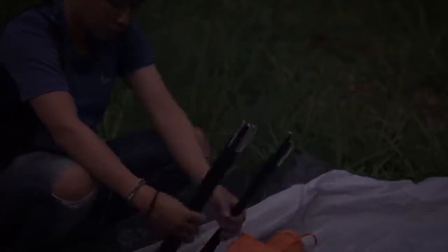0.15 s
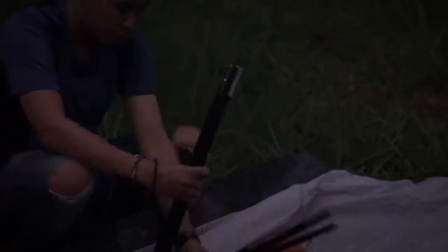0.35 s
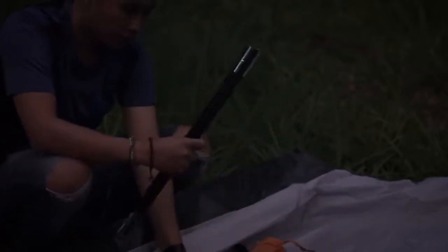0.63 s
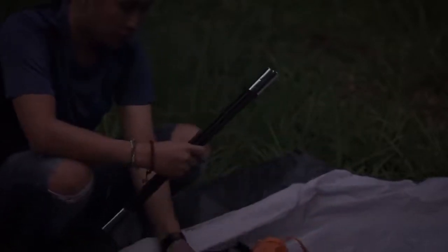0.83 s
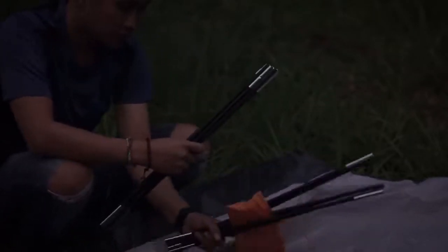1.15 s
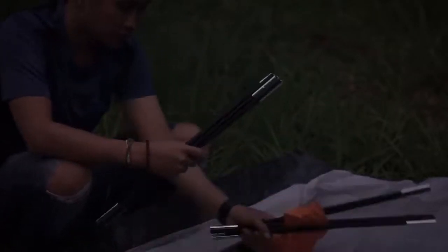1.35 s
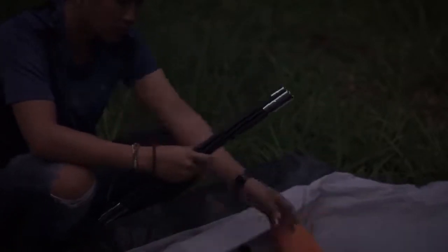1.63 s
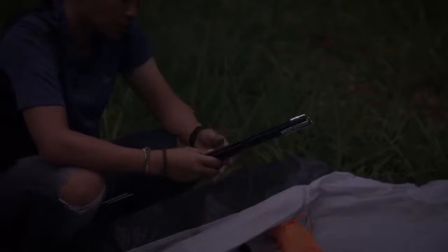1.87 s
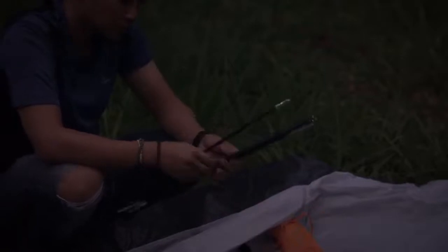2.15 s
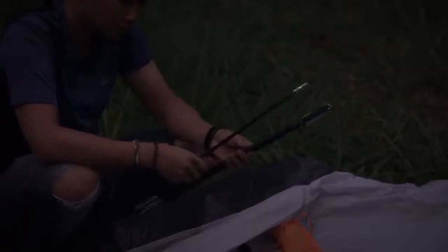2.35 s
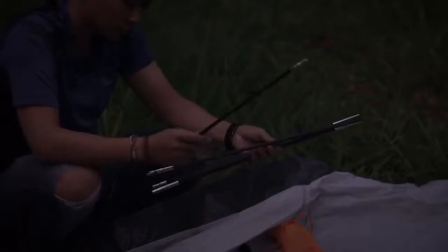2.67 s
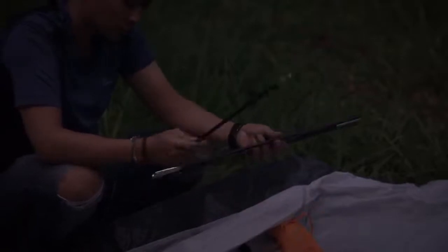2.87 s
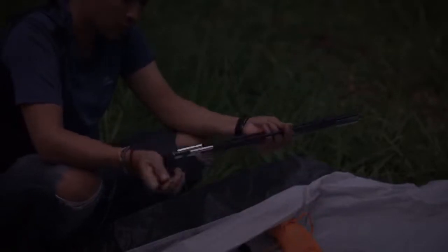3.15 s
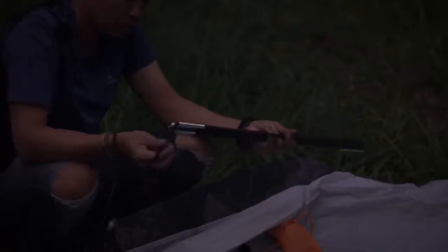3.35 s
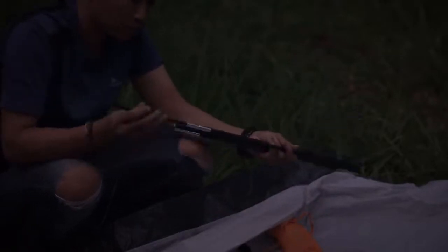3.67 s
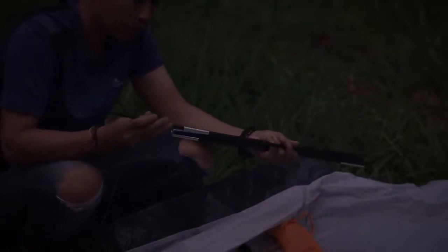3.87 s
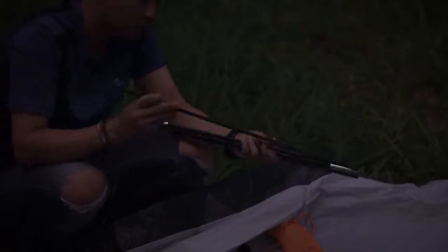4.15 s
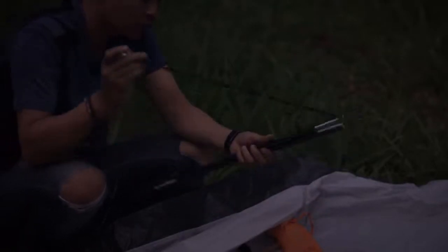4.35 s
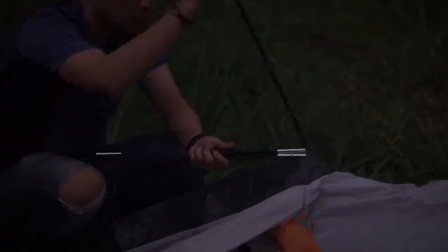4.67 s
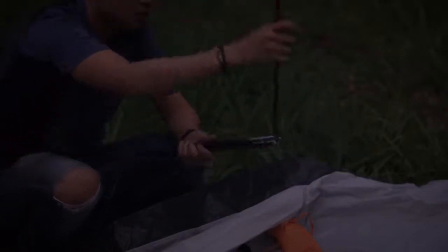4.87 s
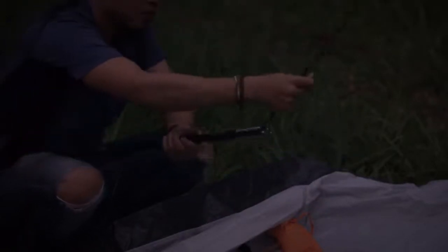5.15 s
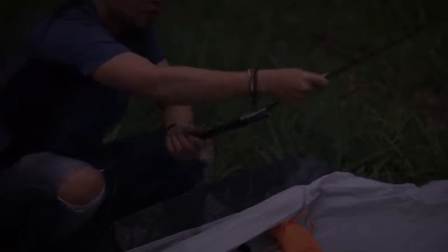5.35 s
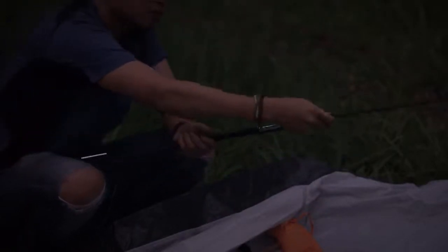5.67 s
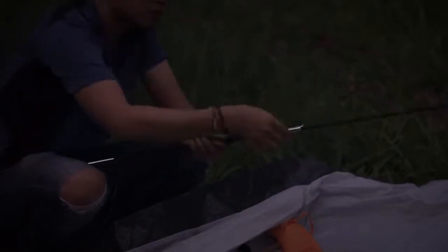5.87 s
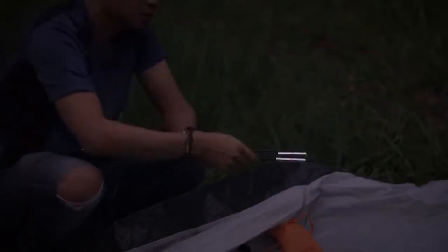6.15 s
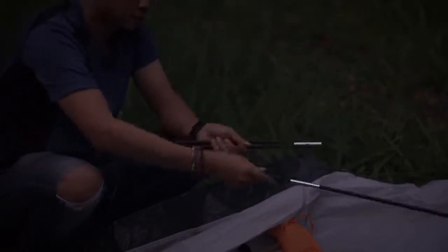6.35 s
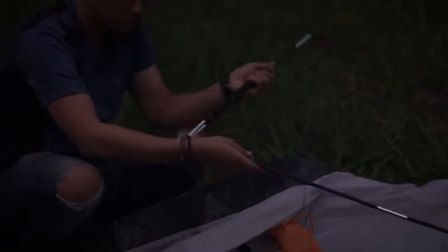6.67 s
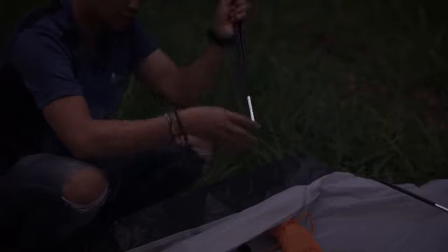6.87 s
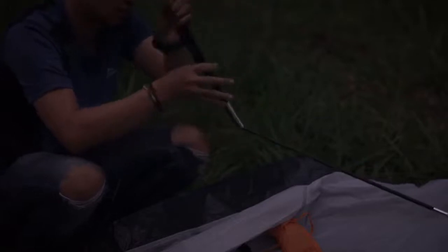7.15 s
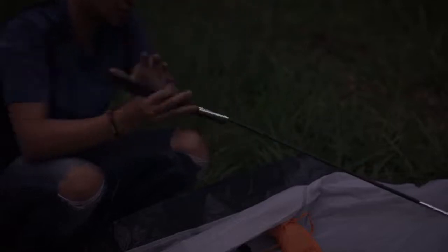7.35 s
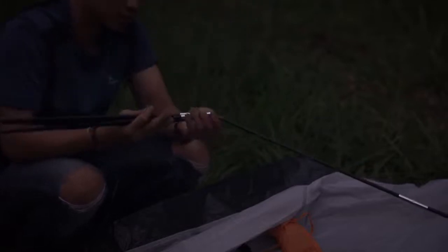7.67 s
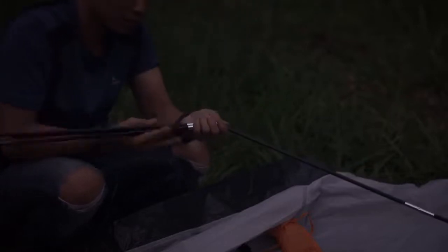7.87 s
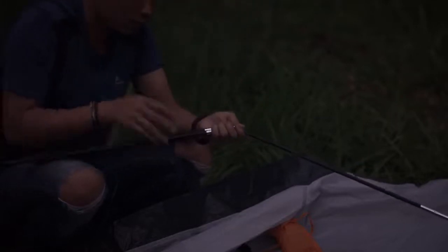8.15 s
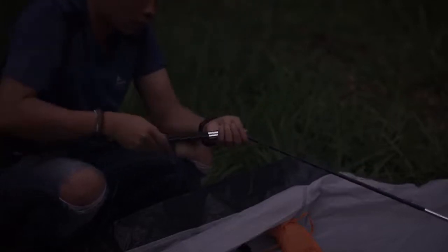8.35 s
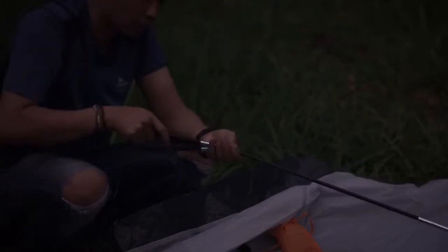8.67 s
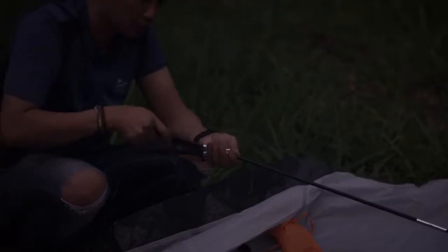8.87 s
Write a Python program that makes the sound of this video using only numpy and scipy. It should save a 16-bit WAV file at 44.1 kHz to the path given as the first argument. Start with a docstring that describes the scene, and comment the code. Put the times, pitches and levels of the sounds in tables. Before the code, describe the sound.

Bright metallic clicks and rattles of thin tent poles over rustling nylon, in a dusk meadow of throbbing insects and a chirping cricket.

```python
"""A meadow at dusk: someone crouching in tall grass lays tent poles on nylon and unfolds a corded pole.
Fabric is shaped noise driven by stroke speed, with creases popping in it and folds snapping over.
Rods and ferrules are noisy contact forces through pole resonances: knocks, scrapes and snaps.
Insects are throbbing noise bands, wing tones and rasps; two far birds are gliding, echoing tones.
The recorder cuts the bass steeply."""
import sys
import numpy as np
from scipy import signal
from scipy.fft import rfft, irfft, next_fast_len
from scipy.io import wavfile

SR = 44100
rng = np.random.default_rng(int(sys.argv[2]) if len(sys.argv) > 2 else 0)


def generate_wav(sig):
    """Save sig (samples, or channels by samples) to the path in sys.argv[1] as 16-bit PCM at SR."""
    pcm = np.round(np.clip(np.atleast_2d(sig).T, -1, 1) * 32767).astype(np.int16)
    wavfile.write(sys.argv[1], SR, pcm)


N = 397782
TIME = np.arange(N) / SR

# far hiss of the meadow: freq_hz, relative_density_db
MEADOW_SPECTRUM = [(1000, 3.5), (2000, -4), (3000, 2.5), (4500, 4.5), (5300, 4.5), (6100, -1), (7800, -1.5),
                   (10000, -1.5), (13000, -2.5), (16000, -4.5)]
MEADOW_DB = -52
# insect choruses: centre_hz, width_hz, level_db (before CHORUS_GAIN_DB), throb_share, left_right_db
CHORUSES = [(3920, 260, -58, 0.74, -8), (3598, 210, -61.5, 0.77, -10), (5502, 190, -63.5, .2, -6.5),
            (8420, 920, -67.5, 0.33, -6.5), (2860, 29, -78, -0.53, -2.5)]
CHORUS_GAIN_DB = 1.8
LULL_S, LULL_HALF_S, LULL_DB = 3.53, 0.14, -6.5  # the choruses fall back briefly
THROB_HZ, THROB_GAIN_HZ_PER_S, FIRST_THROB_S, THROB_DEPTH_DB = 5.356, .036, .02, 4.6
# throb running ahead of its beat, then falling back in the lull: time_s, lead_s
THROB_LEAD = [(1.2, 0), (3.3, .06), (3.8, 0)]
# high insect repeating one rasping phrase
PHRASE_S, PHRASE_START_S = .885, .25
TRILL_HZ, TRILL_RISE_HZ, TRILL_WIDTH_HZ, TRILL_DB, TRILL_SWELL_DB = 8510, 602, 230, -69.5, 6
# strokes of hands, sleeves and poles over nylon:
# fastest_s, rise_s, fall_s, rub_db (before RUB_GAIN_DB), swish_db (before SWISH_GAIN_DB)
STROKES = [(0.131, 0.11, 0.048, -44.5, -41.5), (0.35, 0.083, 0.089, -64.5, -50),
           (0.573, 0.068, 0.059, -40.5, -36.5), (0.684, 0.052, 0.023, -41.5, -44),
           (0.85, 0.45, 0.41, -48, -43.5), (1.02, 0.13, 0.014, -49, -34.5), (1.333, 0.14, 0.03, -56, -52),
           (1.592, 0.081, 0.13, -51, -32), (1.681, 0.072, 0.044, -33.5, -31.5),
           (1.89, 0.08, 0.049, -53.5, -51), (2.018, 0.036, 0.067, -63, -44),
           (2.279, 0.11, 0.081, -77.5, -48.5), (3.099, 0.022, 0.097, -61.5, -50),
           (3.729, 0.087, 0.16, -57.5, -48), (4.238, 0.012, 0.14, -71, -53), (4.476, 0.19, 0.07, -57, -55),
           (5.086, 0.008, 0.016, -55, -56), (5.535, 0.24, 0.25, -60.5, -55.5),
           (6.504, 0.023, 0.19, -54, -51), (6.81, 0.066, 0.16, -55.5, -45),
           (7.3, 0.16, 0.086, -60.5, -51.5), (7.47, 0.112, 0.23, -66.5, -55),
           (8.119, 0.12, 0.17, -73.5, -47), (8.384, 0.08, 0.041, -64.5, -51)]
RUB_GAIN_DB, SWISH_GAIN_DB = 5.0, 1.03
# colour of pressed nylon: freq_hz, relative_density_db
RUB_SPECTRUM = [(1200, 4), (1600, -1), (2300, -2.5), (3400, 8), (4600, 4), (6500, -3), (9000, -13.5),
                (16000, -24.5)]
# colour of dragged nylon: freq_hz, relative_density_db
SWISH_SPECTRUM = [(1200, -27), (3000, -12), (5000, -5.5), (8000, -2), (10500, 0), (13000, -1.5),
                  (16000, -4)]
# mean crease setting, and crease strength against thread hiss
RUB_CRINKLES_PER_S, RUB_CRINKLE, SWISH_CRINKLES_PER_S, SWISH_CRINKLE = 150, .85, 450, .55
# folds of nylon flicking over: start_s, level_db (over 10 ms), pitch_hz
FLICKS = [(0.042, -53.5, 2150), (0.133, -43, 3300), (.146, -45, 3020), (0.372, -54, 3860),
          (0.488, -42.5, 5100), (.5135, -45, 7500), (.5375, -49, 3770), (.549, -40, 5060),
          (.553, -40, 9500), (.5585, -42, 6340), (0.564, -47, 3800), (0.5712, -41, 3900),
          (0.575, -46, 3400), (0.5928, -43, 3400), (.6115, -47, 4200), (0.653, -51, 3200),
          (0.6755, -48, 4170), (0.6818, -38.5, 3700), (0.69, -42, 3900), (0.8457, -44, 4000),
          (1.0194, -49, 4050), (1.0238, -50, 3000)]
# pole knocks and ferrule snaps: start_s, level_db (over 10 ms), treble_over_body_db, chatter_s,
# left_right_db, ferrule_hz, clack_hz, clack_db (over 10 ms)
CLICKS = [(0.0883, -32.5, -8.5, 0.002, -2.5, 10200, 3840, -45),
          (0.1188, -43, -3, .0003, -3, 9800, 4050, -45), (0.1272, -39.5, 4, 0.0009, -2, 9500, 3830, -51),
          (.239, -37.5, 13, 0.0017, -5, 9400, 3700, -50), (0.932, -38, 14, .002, -10, 9350, 3780, -60),
          (0.985, -37, 12, 0.00059, -12, 10600, 3800, -55), (1.198, -28.5, 2, 0.0012, -5, 9700, 3170, -41),
          (1.4168, -45.5, -8, 0.0054, -0.5, 10000, 3800, -54.5),
          (1.4443, -42, -5, 0.0026, -13, 9800, 3950, -45), (1.586, -24, 3, 0.0034, -10, 10000, 3630, -39),
          (1.62, -19, 4, 0.0053, -8.5, 9800, 3150, -29.5), (1.6434, -25, 18, 0.0067, -6, 9800, 4500, -46),
          (1.689, -26, 0, 0.013, -4.5, 10100, 3780, -38), (1.723, -32.5, 9, 0.0052, -4, 12800, 3830, -57),
          (1.8891, -37, 1, 0.011, -4, 10300, 3760, -55),
          (2.0074, -22.5, 21, 0.0013, -7.5, 12200, 3670, -57),
          (2.0426, -37, 6.5, 0.0016, -6, 10200, 3750, -54),
          (2.2167, -23, 23, 0.00016, -1, 10400, 3640, -48), (2.2776, -37, 5, 0.0012, -4, 8950, 3860, -55),
          (2.2998, -40.5, 7, 0.0033, -5, 10000, 3800, -56), (2.6, -50, 10, 0.0066, -7, 10800, 3800, -60),
          (2.8302, -38.5, 6, 0.0083, -5.5, 10600, 3820, -47.5),
          (3.156, -33.5, 4, 0.0027, -6, 9800, 3120, -47.5), (3.653, -38, 9, .0014, -6, 10400, 3800, -60),
          (3.675, -33, 2, 0.00078, -6, 10200, 3920, -53),
          (3.7207, -18, 13.5, 0.0017, -6.5, 11700, 3960, -50), (3.723, -22, 5, 0.0027, 0, 11100, 3150, -55),
          (4.1598, -51, 3, 0.0034, -7, 9800, 3600, -46), (4.163, -59, -4, 0.0028, -8, 9800, 2930, -51.5),
          (4.357, -40, 1.5, 0.0048, -6, 10400, 3610, -61),
          (5.3789, -36, 8, 0.0022, -4.5, 10500, 4130, -42.5),
          (5.392, -43.5, 0, 0.006, -7, 10200, 3830, -48), (6.5047, -53, 4, .0004, -11, 10900, 3380, -59),
          (6.72, -50, 18, 0.00074, -13, 13000, 3800, -64),
          (6.7888, -35.5, 5, 0.0021, -14, 11500, 3000, -48.5),
          (6.87, -49, 10, .0004, -13, 13200, 3800, -64), (6.877, -49, 9, .003, -11, 13100, 3800, -60),
          (7.2946, -43.5, 8, 0.0027, -4, 12600, 3800, -60),
          (8.0435, -34, 5.5, 0.0041, -4.5, 11600, 3820, -47),
          (8.0815, -17, 18, 0.0029, -1.5, 11950, 3960, -40),
          (8.2315, -36.5, 3.5, 0.0044, -5.5, 12000, 3750, -44),
          (8.355, -28, 7, 0.0038, -4.5, 12400, 3880, -51), (8.487, -49.5, 11, 0.0072, -5, 12500, 3800, -67),
          (8.801, -40, 5.5, 0.0045, -7, 10000, 3590, -57)]
SOFT_S, CLACK_WIDTH_HZ = .005, 230
# ring of a pole section with its ferrule: mode_hz, width_hz, gain_db (means; each contact varies)
POLE_MODES = [(2970, 22, 2), (3787, 95, 7), (4743, 68, 7), (5654, 230, 8), (6650, 950, 0),
              (7800, 350, -3.5), (8750, 320, 6.5), (10520, 170, 1), (11200, 110, 4), (11600, 92, -0.5),
              (13000, 210, 3), (14700, 260, 3)]
# low, slowly rising bird whistles: start_s, start_hz, level_db (before BIRD_GAIN_DB)
WHISTLES = [(0.252, 1825, -70), (3.73, 1940, -74), (4.49, 1878, -68.5), (6.929, 1920, -70.5),
            (7.69, 1874, -71)]
# another bird's falling chips: start_s, start_hz, level_db (before BIRD_GAIN_DB)
CHIPS = [(1.432, 5820, -55), (2.055, 5330, -54), (2.69, 5070, -61), (2.88, 5460, -62), (4.455, 5350, -54),
         (4.668, 5570, -60), (4.787, 5030, -58), (6.197, 5840, -56.5), (6.474, 5500, -54),
         (8.58, 5470, -60), (8.727, 5900, -57.5)]
WHISTLE_S, WHISTLE_RISE_HZ, WHISTLE_DIRECT = .32, 78, 0.23  # direct: against the echoes
CHIP_S, CHIP_FALL_HZ, CHIP_DIRECT = 0.04, 757, 0.99
BIRD_GAIN_DB, BIRD_SIDE_DB = 0.5, -3.5
# rods sliding on each other: start_s, length_s, scrape_db, lowest_hz, sing_start_hz, sing_db
SLIDES = [(0.959, 0.0274, -24.5, 7600, 3900, -43.5), (1.635, 0.022, -29, 5000, 4530, -48),
          (1.659, 0.037, -46, 4000, 3550, -41), (3.078, 0.064, -58, 4040, 3460, -52),
          (3.664, 0.024, -40, 5900, 3700, -58), (3.733, 0.011, -37, 3560, 3240, -57),
          (4.231, 0.039, -44, 3980, 3670, -50.5), (5.068, 0.035, -49.5, 3500, 3150, -54),
          (6.49, 0.036, -56, 3500, 3450, -53.5), (8.032, 0.012, -41, 4870, 3920, -47),
          (8.078, 0.013, -25.5, 7000, 3940, -49), (8.086, 0.025, -41, 7000, 3970, -52)]
SING_WIDTH_HZ = 240
# nearer cricket in bouts: first_chirp_s, chirp_count, level_db (before CRICKET_GAIN_DB)
CRICKET_BOUTS = [(1.118, 4, -56.5), (1.826, 4, -50.5), (2.461, 6, -52.5), (3.647, 5, -51.5),
                 (4.518, 5, -54), (5.47, 5, -53), (6.41, 5, -54), (7.122, 4, -55), (7.99, 5, -55.5),
                 (8.715, 4, -55.5)]
CRICKET_HZ, CHIRP_GAP_S, CRICKET_GAIN_DB = 5640, .077, -2
# smooth rods running through the palm: fastest_s, rise_s, fall_s, level_db
GLIDES = [(1.33, 0.029, .02, -51), (1.51, 0.018, 0.058, -36), (1.725, 0.025, 0.009, -35),
          (2.035, 0.022, 0.018, -49), (6.505, .012, 0.13, -49), (6.722, 0.0065, 0.011, -50),
          (6.785, 0.038, 0.12, -43), (6.875, .03, .02, -48), (6.94, 0.024, .025, -49),
          (7.105, 0.018, 0.038, -53), (7.29, .02, .025, -53), (7.49, 0.1, 0.22, -51),
          (8.11, 0.019, 0.032, -43.5), (8.305, 0.037, .02, -49.5)]
# colour of a rod gliding through the palm: freq_hz, relative_density_db
GLIDE_SPECTRUM = [(5000, -27), (8000, -14), (10000, -7.5), (11500, -3), (13000, 1.5), (14200, -2.5),
                  (15500, 0.5)]
# second, lower rasping insect: middle_s, half_length_s (to 1/e), pitch_hz, level_db
BUZZES = [(5.003, 0.39, 7430, -66.5), (5.778, 0.22, 7270, -68)]
BASS_CUT_HZ, CUTOFF_HZ = 1719, 15800


def from_db(db):
    """Decibels to gain."""
    return 10 ** (np.asarray(db) / 20)


def rms_one(x):
    """Scale to unit power."""
    return x / np.sqrt(np.mean(x ** 2) + 1e-20)


def pan(db):
    """Left and right gains of unit mean power."""
    return rms_one(from_db([[db / 2], [-db / 2]]))


def add(out, start_s, sound):
    """Mix a stereo sound in at a time."""
    i = max(int(start_s * SR), 0)
    out[:, i:i + sound.shape[1]] += sound[:, :N - i]


def cut(x, hz, kind, order=2):
    """Butterworth filter."""
    safe_hz = np.clip(hz, 10, .48 * SR)
    return signal.sosfilt(signal.butter(order, safe_hz, kind, fs=SR, output="sos"), x)


def resonance(x, hz, width_hz):
    """Two-pole resonance with about unit gain at its peak."""
    r = np.exp(-np.pi * width_hz / SR)
    numerator = np.array([1, 0, -1]) * (1 - r * r) / 2
    denominator = [1, -2 * r * np.cos(2 * np.pi * hz / SR), r * r]
    return signal.lfilter(numerator, denominator, x + 1e-18)


def coloured(x, spectrum):
    """Give a steady texture its spectrum; unit power."""
    hz, db = np.transpose(spectrum)
    size = next_fast_len(N)
    bins_hz = np.maximum(np.fft.rfftfreq(size, 1 / SR), 1)
    gain = from_db(np.interp(np.log(bins_hz), np.log(hz), db))
    return rms_one(irfft(rfft(x, size) * gain, size)[..., :N])


def drift(rate_hz):
    """Slow random wander with a spread of one: low-passed noise computed every 40 samples."""
    r = np.exp(-80 * np.pi * rate_hz / SR)
    noise = rng.standard_normal(N // 40 + 2002)
    slow = signal.lfilter([1], [1, -2 * r, r * r], noise)[2000:]  # drop the filter's run-in
    return np.interp(np.arange(N) / 40, np.arange(len(slow)), rms_one(slow))


def two_ears(three, shared):
    """A common signal plus one of its own for each side."""
    shared = np.clip(shared, 0, 1)
    return np.sqrt(shared) * three[0] + np.sqrt(1 - shared) * three[1:]


def hump(middle_s, half_s):
    """Bell curve in time, one on top."""
    return np.exp(-np.minimum(((TIME - middle_s) / half_s) ** 2, 40))


def stroke_speed(fastest_s, rise_s, fall_s):
    """A movement gathers speed up to its fastest moment and dies away; one on top."""
    span_s = np.maximum(np.where(TIME < fastest_s, rise_s, fall_s), 1e-3)
    return np.exp(-np.minimum(np.abs(TIME - fastest_s) / span_s, 20))


def meadow():
    """Even far hiss."""
    return from_db(MEADOW_DB) * pan(db=-1.0) * coloured(rng.standard_normal((2, N)), MEADOW_SPECTRUM)


def choruses(waver_db=1.5):
    """Far insects as noise bands, the loudest throbbing in step at a slowly quickening pace."""
    out = np.zeros((2, N))
    t = TIME - FIRST_THROB_S + np.interp(TIME, *np.transpose(THROB_LEAD))
    throb = np.cos(2 * np.pi * (THROB_HZ + THROB_GAIN_HZ_PER_S * t / 2) * t)
    swell_db = CHORUS_GAIN_DB + LULL_DB * hump(LULL_S, LULL_HALF_S)
    for hz, width_hz, db, share, side_db in CHORUSES:
        band_hz = [hz - width_hz / 2, hz + width_hz / 2]
        song = rms_one(cut(rng.standard_normal((2, N)), band_hz, "band"))
        level_db = db + swell_db + share * THROB_DEPTH_DB * throb + waver_db * drift(1.7)
        out += song * pan(side_db) * from_db(level_db)
    return out


def rasp(hz, width_hz):
    """A rasping wing tone, blurred by distance: low-passed noise times a tone; unit power."""
    tone = np.sin(2 * np.pi * np.cumsum(hz * np.ones(N)) / SR)
    return rms_one(cut(rng.standard_normal((2, N)), width_hz, "low") * tone)


def trill(release_share=0.049, wander_hz=45, growth_db_per_s=0.84):
    """Phrase after phrase climbs in pitch and level, then breaks off; the song grows louder."""
    part = (TIME - PHRASE_START_S) / PHRASE_S % 1
    fade = np.minimum(np.minimum(part, 1 - part) / release_share, 1)
    pitch_hz = TRILL_HZ + TRILL_RISE_HZ * part + wander_hz * drift(1.0)
    growth_db = growth_db_per_s * (TIME - TIME.mean())
    level_db = TRILL_DB + TRILL_SWELL_DB * part + growth_db
    return pan(db=-6) * fade * from_db(level_db) * rasp(pitch_hz, TRILL_WIDTH_HZ)


def weave(spectrum, crinkles_per_s, crinkle_share, flutter_db, shared):
    """Threads rub as a fluttering hiss; creases pop in it in little clusters."""
    rate_per_s = crinkles_per_s * from_db(2.9 * drift(28))
    strength = from_db(1.3 * np.minimum(rng.exponential(1, N), 2.5))
    creases = (rng.random(N) < rate_per_s / SR) * strength
    pops = crinkle_share * rms_one(creases) * rng.choice([-1, 1], (3, N))
    friction = rng.standard_normal((3, N)) + pops
    return coloured(two_ears(friction, shared), spectrum) * from_db(flutter_db * drift(23))


def fabric():
    """Stroke speed drives the level: pressed nylon rubs low, lightly dragged nylon swishes high."""
    rub_power = swish_power = 0
    for fastest_s, rise_s, fall_s, rub_db, swish_db in STROKES:
        speed = stroke_speed(fastest_s, rise_s, fall_s)
        rub_power = rub_power + (speed * from_db(rub_db + RUB_GAIN_DB)) ** 2
        swish_power = swish_power + (speed * from_db(swish_db + SWISH_GAIN_DB)) ** 2
    pressed = weave(RUB_SPECTRUM, RUB_CRINKLES_PER_S, RUB_CRINKLE, flutter_db=0.5, shared=0.0087)
    dragged = weave(SWISH_SPECTRUM, SWISH_CRINKLES_PER_S, SWISH_CRINKLE, flutter_db=1.74, shared=0.13)
    rub = cut(np.sqrt(rub_power) * pressed, 910, "high", order=4)
    swish = np.sqrt(swish_power) * dragged
    return (rub + swish) * pan(db=-5.5)


def flicks(snap_s=.0007, width_hz=1500, crack=0.33, side_db=-5):
    """A taut fold flips over with a dry snap, coloured by its size."""
    out, t = np.zeros((2, N)), np.arange(SR // 50) / SR
    for start_s, db, hz in FLICKS:
        force = two_ears(rng.standard_normal((3, len(t))), shared=0.54) * np.exp(-t / snap_s)
        snap = rms_one(resonance(force, hz, width_hz) + crack * force)
        snap *= np.sqrt(.01 / t[-1])  # level counted over 10 ms
        add(out, start_s, from_db(db) * pan(side_db) * snap)
    return out


def pole(force, crack=1.08):
    """Contact force as a broad crack and through the modes, which shift with section and grip."""
    gains = from_db(2.2 * rng.standard_normal(len(POLE_MODES)))
    shifts = 1 + .015 * rng.standard_normal(len(POLE_MODES))
    out = crack * force
    for gain, shift, (hz, width_hz, db) in zip(gains, shifts, POLE_MODES):
        out = out + gain * from_db(db) * resonance(force, hz * shift, width_hz)
    return out


def clicks(first_blow=0.52, scatter_db=-10, scatter_t60_s=0.092, split_hz=7000,
           ferrule_width_hz=3500, ferrule_gain=4, ferrule_edge=0.78, low_leak_db=-8):
    """Hard first blow, alike in both ears, then chatter; ground and body scatter a short tail."""
    out, t = np.zeros((2, N)), np.arange(SR // 7) / SR
    blow = rms_one(np.exp(-t / 0.00005) * np.cos(2 * np.pi * 9000 * t))
    for start_s, db, bright_db, chatter_s, side_db, ferrule_hz, clack_hz, clack_db in CLICKS:
        chatter = np.exp(-(t / max(chatter_s, 1e-4)) ** 0.81)
        contacts = rms_one(two_ears(rng.standard_normal((3, len(t))), shared=0.38) * chatter)
        hardness = first_blow * np.exp(-chatter_s / SOFT_S)  # long, sliding contacts start softly
        strike = contacts + hardness * blow
        tail = rms_one(rng.standard_normal((2, len(t))) * from_db(-60 * t / scatter_t60_s))
        ring = pole(strike + from_db(scatter_db) * tail)
        low_leak = from_db(low_leak_db) * cut(ring, 600, "low")  # faint low-frequency share
        body = cut(ring, 3400, "high", order=3) + low_leak
        body = rms_one(cut(body, split_hz, "low", order=3))
        # metal on metal adds the broad, bright ring of the short ferrule
        treble = cut(ring, ferrule_edge * ferrule_hz, "high", order=3)
        treble = rms_one(treble + ferrule_gain * resonance(treble, ferrule_hz, ferrule_width_hz))
        # the struck rod bends and clacks at a pitch set by where it is held
        clack = rms_one(resonance(strike, clack_hz, CLACK_WIDTH_HZ))
        knock = from_db(db) * rms_one(body + from_db(bright_db) * treble) + from_db(clack_db) * clack
        add(out, start_s, pan(side_db) * knock * np.sqrt(.01 / t[-1]))  # levels over 10 ms
    return out


def far_call(length_s, from_hz, glide_hz, direct, quaver_hz=22):
    """Gliding, unsteady whistle smeared by the way through the trees; unit power over its length."""
    t = np.arange(SR // 2) / SR
    part = np.minimum(t / length_s, 1)
    quaver = rms_one(cut(rng.standard_normal(len(t)), 40, "low"))
    pitch_hz = from_hz + glide_hz * part + quaver_hz * quaver
    call = np.sin(np.pi * part) * np.sin(2 * np.pi * np.cumsum(pitch_hz) / SR)
    echoes = rng.standard_normal((2, SR // 8)) * np.exp(-t[:SR // 8] / .018)
    far = signal.fftconvolve(call[None], echoes, axes=1)[:, :len(t)]
    return rms_one(rms_one(far) + direct * rms_one(call)) * np.sqrt(length_s / t[-1])


def whistles():
    """A far bird's low whistles: slowly rising tones, mostly echo."""
    out = np.zeros((2, N))
    for start_s, hz, db in WHISTLES:
        call = far_call(WHISTLE_S, hz, WHISTLE_RISE_HZ, WHISTLE_DIRECT)
        add(out, start_s, from_db(db + BIRD_GAIN_DB) * pan(BIRD_SIDE_DB) * call)
    return out


def slides(slips_per_s=6000, side_db=-6, sag_hz=380):
    """Tiny slips of metal on rod excite the modes; the rod sings, lower as the contact travels."""
    out, t = np.zeros((2, N)), np.arange(SR // 8) / SR
    for start_s, length_s, db, lowest_hz, sing_hz, sing_db in SLIDES:
        grain = two_ears(rng.standard_normal((3, len(t))), shared=0.15)
        slips = (rng.random(len(t)) < slips_per_s / SR) * grain
        part = np.minimum(t / length_s, 1)
        force = slips * np.sqrt(np.abs(np.sin(np.pi * part)))
        # a light touch excites only the high modes
        scrape = rms_one(cut(pole(force, crack=0.94), lowest_hz, "high", order=3))
        tone = np.sin(2 * np.pi * np.cumsum(sing_hz - sag_hz * part) / SR)
        sing = rms_one(cut(force, SING_WIDTH_HZ, "low") * tone)
        slide = from_db(db) * scrape + from_db(sing_db) * sing
        add(out, start_s, slide * pan(side_db) * np.sqrt(length_s / t[-1]))  # levels over length_s
    return out


def cricket(chirp_s=0.014, width_hz=60):
    """Bouts of evenly spaced chirps on one wing resonance: a tone with a little narrow noise."""
    loud = np.zeros(N)
    for first_s, chirps, db in CRICKET_BOUTS:
        for s in first_s + CHIRP_GAP_S * np.arange(round(chirps)):
            near = slice(max(int((s - CHIRP_GAP_S) * SR), 0), int((s + CHIRP_GAP_S) * SR))
            loud[near] += from_db(db + CRICKET_GAIN_DB) * np.exp(-((TIME[near] - s) / chirp_s) ** 2)
    band_hz = [CRICKET_HZ - width_hz, CRICKET_HZ + width_hz]
    blur = rms_one(cut(rng.standard_normal((2, N)), band_hz, "band"))
    return loud * pan(db=-6.5) * rms_one(np.sin(2 * np.pi * CRICKET_HZ * TIME) + 0.13 * blur)


def glides(side_db=-7):
    """Smooth rods running through the palm give an even, airy hiss."""
    power = 0
    for fastest_s, rise_s, fall_s, db in GLIDES:
        power = power + (from_db(db) * stroke_speed(fastest_s, rise_s, fall_s)) ** 2
    hiss = coloured(two_ears(rng.standard_normal((3, N)), shared=0.34), GLIDE_SPECTRUM)
    hiss = rms_one(cut(hiss, CUTOFF_HZ, "low", order=8))
    return np.sqrt(power) * hiss * pan(side_db)


def chips():
    """Another far bird's short falling chips, direct path and echoes about equal."""
    out = np.zeros((2, N))
    for start_s, hz, db in CHIPS:
        call = far_call(CHIP_S, hz, -CHIP_FALL_HZ, CHIP_DIRECT)
        add(out, start_s, from_db(db + BIRD_GAIN_DB) * pan(BIRD_SIDE_DB) * call)
    return out


def buzzes():
    """A second insect's rasp, lower than the trill, swells and fades twice."""
    out = np.zeros((2, N))
    for middle_s, half_s, hz, db in BUZZES:
        out += from_db(db) * hump(middle_s, half_s) * rasp(hz, width_hz=140)
    return pan(db=-6) * out


def scene():
    """Pole and fabric close by, the meadow all around."""
    insects = choruses() + trill() + cricket() + buzzes()
    nylon = fabric() + flicks()
    rods = clicks() + slides() + glides()
    birds = whistles() + chips()
    return meadow() + insects + nylon + rods + birds


def record(dry, bass_left_db=-46, hiss_db=-106):
    """Steep bass cut, faint electronic hiss, clipping at full scale, then a steep top cut."""
    thin = cut(dry, BASS_CUT_HZ, "high", order=10) + from_db(bass_left_db) * dry
    hiss = from_db(hiss_db) * cut(rng.standard_normal((2, N)), 900, "low", order=1)
    clipped = np.clip(thin + hiss, -1, 1)
    return signal.sosfilt(signal.ellip(10, .1, 70, CUTOFF_HZ, fs=SR, output="sos"), clipped)


dry = scene()
out = record(dry)
generate_wav(out)
```